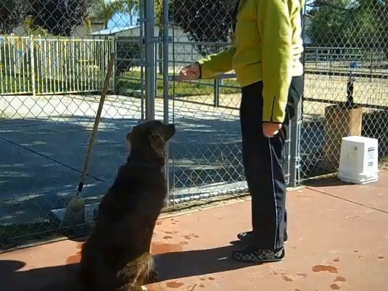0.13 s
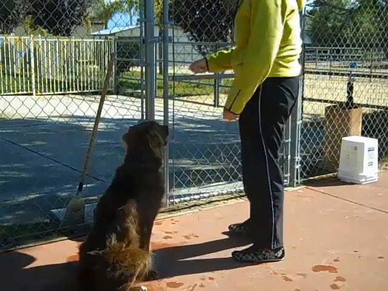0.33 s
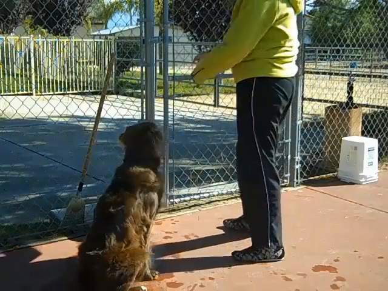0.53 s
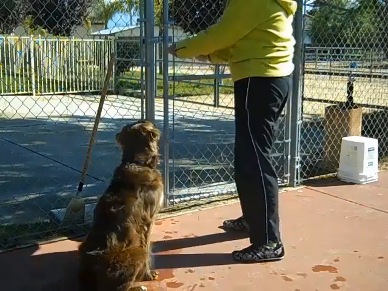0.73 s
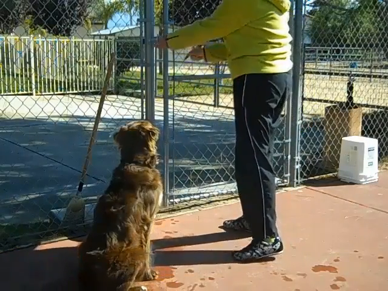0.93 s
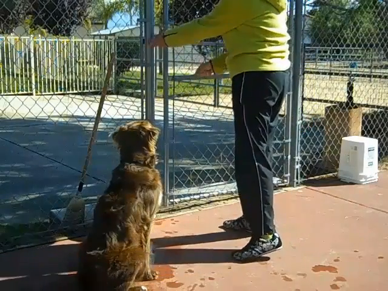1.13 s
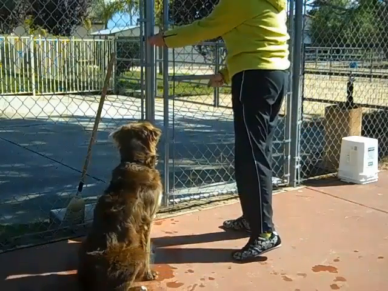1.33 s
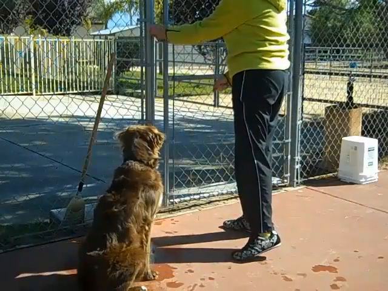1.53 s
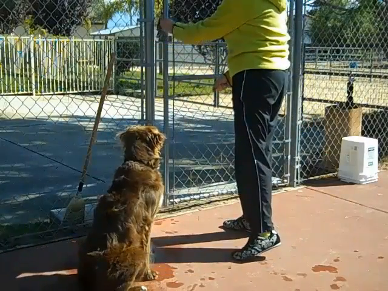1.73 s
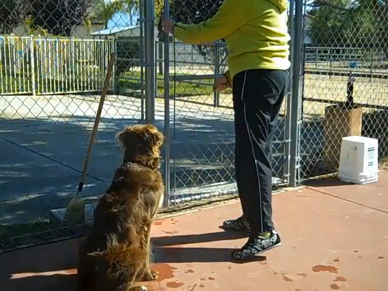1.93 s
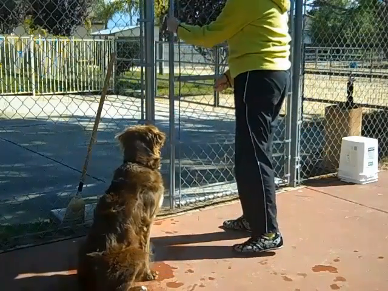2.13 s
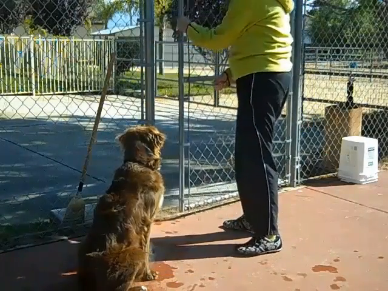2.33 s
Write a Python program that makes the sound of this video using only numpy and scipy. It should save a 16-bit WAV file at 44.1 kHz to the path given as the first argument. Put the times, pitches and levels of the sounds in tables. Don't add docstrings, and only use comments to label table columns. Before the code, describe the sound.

A metal gate latch clinks twice, scrapes briefly, then drops with a loud ringing clank outdoors

```python
import sys
import numpy as np
from scipy import signal
from scipy.fft import rfft, irfft
from scipy.io import wavfile
from scipy.ndimage import uniform_filter1d

SR = 44100
rng = np.random.default_rng(int(sys.argv[2]) if len(sys.argv) > 2 else 0)


def bounce(signal):
    frames = np.transpose(np.atleast_2d(signal))
    limited = np.clip(frames, -1, 1)
    pcm = np.round(limited * 32767).astype(np.int16)
    wavfile.write(sys.argv[1], SR, pcm)


def undo_db(level):
    steps = np.asarray(level, float) / 20
    return 10 ** steps


N = 109720


def read(points, hz):
    f, value = np.transpose(points)
    return np.interp(np.log(hz + 1), np.log(f + 1), value)


def over_time(points, column=1):
    table = np.array(points)
    return np.interp(np.arange(N) / SR, table[:, 0], table[:, column])


def evened(x):
    return x / np.sqrt(np.mean(x ** 2) + 1e-20)


def add(mix, start_s, sound):
    part = mix[round(start_s * SR):][:len(sound)]
    part += sound[:len(part)]


def resonate(x, pitch_hz, width_hz):
    turn = np.exp(2j * np.pi * np.cumsum(pitch_hz * np.ones(len(x))) / SR)
    radius = np.exp(-np.pi * width_hz / SR)
    return 2 * (turn * signal.lfilter([1 - radius], [1, -radius], x / turn)).real


def narrow_noise(size, pitch_hz, width_hz):
    once = resonate(rng.standard_normal(size), pitch_hz, width_hz)
    return evened(resonate(once, pitch_hz, width_hz))


def coloured(x, points, share=1):
    hz = np.fft.rfftfreq(x.shape[-1], 1 / SR)
    return irfft(rfft(x) * undo_db(share * read(points, hz)), x.shape[-1])


# pitch_hz, likeness (0 to 1)
PORT_LIKENESS = [(60, 1), (180, 0.56), (540, 0.67), (1630, 0.39), (4900, 0.029), (14700, 0.29)]


def hiss(colour, patchy_db, size):
    hz = np.fft.rfftfreq(size, 1 / SR)
    a, b, c, d, patches = rng.standard_normal((4 * N // size + 5, len(hz), 5)).T
    patches = uniform_filter1d(uniform_filter1d(patches, size=9, axis=0), size=6, axis=1)
    same = np.clip(read(PORT_LIKENESS, hz), -1, 1)[:, None]
    left = a + 1j * b
    right = same * left + np.sqrt(1 - same ** 2) * (c + 1j * d)
    gain = undo_db(read(colour, hz)[:, None] + patchy_db * evened(patches))
    noise = signal.istft(np.array([left, right]) * gain, nperseg=size, noverlap=3 * size // 4)[1]
    return evened(noise[:, :N])


# pitch_hz, density_db (dB per Hz)
WASH_SPECTRUM = [(20, -8), (124, -9), (1000, -15), (1700, -23), (5500, -24.5), (8000, -24), (9800, -33),
                 (14500, -33.5)]
# pitch_hz, left_minus_right_db
WASH_BALANCE = [(60, -3.5), (180, 2), (540, 1.5), (1630, 1.5), (4900, 1), (14700, 2)]


def traffic_wash():
    wash = undo_db(-54.5) * hiss(WASH_SPECTRUM, 0.43, size=1024)
    return np.array([coloured(wash[0], WASH_BALANCE, 0.24), coloured(wash[1], WASH_BALANCE, -1.4)])


# start_s, pitch_hz, level_db
DRONE_COURSE = [(0, 130.4, -70.5), (.35, 126.3, -62), (.7, 118.5, -63.5), (1.05, 117.8, -62.5),
                (1.3, 128.9, -64.5), (1.65, 129, -59), (2.49, 131.3, -64.5)]


def traffic_drone():
    pitch_hz = over_time(DRONE_COURSE)
    blur = evened(resonate(rng.standard_normal(N), pitch_hz, 33))
    tone = 1.05 * np.sin(2 * np.pi * np.cumsum(pitch_hz) / SR)
    return undo_db(over_time(DRONE_COURSE, column=2)) * (blur + tone)


# start_s, level_db
WIND_GUSTS = [(0, -81), (.8, -63), (1.5, -67), (2.0, -61.5), (2.06, -45.5), (2.16, -52.5), (2.3, -59),
              (2.44, -52), (2.49, -51)]


def wind():
    band = signal.butter(2, [34, 75], "band", fs=SR, output="sos")
    lumps = evened(signal.sosfilt(band, rng.standard_normal((2, N))))
    port_db = np.array([[-4], [1]])
    return undo_db(over_time(WIND_GUSTS) + port_db) * lumps


def bird():
    start_s, length_s, echo_delay_s = 0.372, 0.031, 0.047
    t, out = np.arange(0, length_s, 1 / SR), np.zeros(N)
    swoop_hz = 1680 * np.exp(-t / 0.00186)
    upper = np.sin(2 * np.pi * np.cumsum(6780 + swoop_hz) / SR)
    lower = 0.55 * np.sin(2 * np.pi * np.cumsum(6430 + swoop_hz) / SR)
    chip = undo_db(-42) * (upper + lower) * np.sin(np.pi * t / length_s) ** 0.52
    add(out, start_s, chip)
    add(out, start_s + echo_delay_s, undo_db(-24) * chip)
    return out


# start_s, level_db, pitch_hz, width_hz, t60_s
WIRE_TICKS = [(.058, -46, 7250, 3000, 0.021), (.087, -51, 2730, 1490, 0.036),
              (.646, -43, 6100, 1500, 0.024), (.74, -41, 5040, 1200, 0.019), (.8305, -39, 5610, 2500, .015),
              (.868, -47.5, 6220, 700, 0.016), (.916, -50, 5210, 900, .02), (.9635, -49, 5320, 1200, .02),
              (1.347, -48, 5000, 1500, .02), (1.576, -43, 5750, 700, 0.089),
              (1.702, -38.5, 7800, 4000, .026), (1.712, -33.5, 7650, 2482, 0.017),
              (2.27, -43, 507.4, 302, 0.036), (2.4055, -36, 4530, 5000, 0.0062),
              (2.445, -51, 5960, 2000, 0.017), (2.486, -44.5, 6470, 2000, .026)]


def wire_ticks():
    out, t = np.zeros(N), np.arange(SR // 4) / SR
    for start_s, level_db, pitch_hz, width_hz, t60_s in WIRE_TICKS:
        snap = narrow_noise(len(t), pitch_hz, width_hz)
        rise = np.minimum(10 * t / t60_s, 1)
        add(out, start_s, undo_db(level_db - 3 - 60 * t / t60_s) * rise * snap)
    return out


# start_s, level_db, t60_s, pitch_hz
NARROW_RINGS = [
    (.345, -68, .08, 14200),
    (.648, -74, 0.11, 13900),
    (.73, -67, 0.32, 13900),
    (1.5, -72, .15, 13800),
    (1.738, -61, .1, 14250),
    (1.93, -62, 0.13, 13900),
    (2.18, -54, 0.13, 2704),
    (2.185, -57, .12, 4230),
]


def narrow_rings():
    out, t = np.zeros(N), np.arange(SR // 4) / SR
    for start_s, level_db, t60_s, pitch_hz in NARROW_RINGS:
        ring = evened(resonate(rng.standard_normal(len(t)), pitch_hz, 60))
        add(out, start_s, undo_db(level_db - 60 * t / t60_s) * ring)
    return out


def cloth_zip():
    out, t = np.zeros(N), np.arange(SR // 4) / SR
    way = np.minimum(t / 0.05, 1)
    pitch_hz = 6200 + (7500 - 6200) * way
    add(out, 0.696, undo_db(-56) * np.sin(np.pi * way) * narrow_noise(len(t), pitch_hz, 570))
    return out


# start_s, level_db
SLEEVE_MOTION = [(.3, -76), (.55, -68), (.62, -60), (.69, -64.5), (.72, -57), (.82, -58), (.9, -65),
                 (1.0, -66.5), (1.15, -79)]
# pitch_hz, density_db (dB per Hz)
SLEEVE_SPECTRUM = [(880, -44.5), (1500, -20), (3450, -9), (5150, 8), (5600, 9.5), (7010, 16.5),
                   (12800, -12.5), (14000, -16)]


def sleeve():
    return undo_db(over_time(SLEEVE_MOTION)) * hiss(SLEEVE_SPECTRUM, 1.1, size=256)


# start_s, level_db
SHOE_MOTION = [(0, -62.5), (.1, -61), (.18, -57), (.22, -86), (.33, -68), (.4, -89)]
# pitch_hz, density_db (dB per Hz)
SHOE_SPECTRUM = [(530, -28), (900, -2), (4150, -5.5), (4830, -8.5), (7370, -6.5), (12000, -32.5),
                 (15600, -64), (22000, -120)]


def shoe():
    return undo_db(over_time(SHOE_MOTION)) * hiss(SHOE_SPECTRUM, 2.7, size=256)


def struck(hits, modes, buzz, buzz_db, buzz_t60, mesh_db):
    out, t = np.zeros(N), np.arange(SR // 2) / SR
    pitch_hz, mode_db, t60_s = np.tile(np.transpose(modes), 3)[:, :, None]
    side = np.repeat([-1, 0, 1], len(modes))[:, None]
    pitch_hz = pitch_hz * (1 + 0.005 * (side + rng.uniform(-0.3, 0.28, pitch_hz.shape)))
    t60_s = t60_s * rng.uniform(0.46, 1.02, pitch_hz.shape)
    rise = np.minimum(t * pitch_hz / 1.5, 1)
    rings = undo_db(mode_db - 60 * t / t60_s) * np.sin(2 * np.pi * pitch_hz * t) * rise
    flutter = evened(uniform_filter1d(rng.standard_normal(rings.shape), size=330))
    rings = rings * undo_db(5 * np.minimum(t / 0.03, 1) * flutter)
    mesh_t60_s = 0.29
    fall = undo_db(buzz_db - 60 * t / buzz_t60) + undo_db(mesh_db - 60 * t / mesh_t60_s)
    octaves = [(625, -2), (5000, 0), (20000, 1.5)]
    for start_s, level_db, tilt_db in hits:
        dense = evened(coloured(rng.standard_normal(len(t)), buzz)) * fall
        shares = rng.choice([-1, 1], len(pitch_hz)) * rng.uniform(0.56, 1.195, len(pitch_hz))
        blow = coloured(0.23 * shares @ rings + dense, octaves, tilt_db)
        add(out, start_s, undo_db(level_db) * np.minimum(t / 0.00067, 1) * blow)
    return out


# pitch_hz, density_db (dB per Hz)
COLLAR_DENSE = [(470, -18), (800, -5.5), (2690, 4.5), (3440, -9), (4240, 1), (4680, 0.5), (13400, -33.5),
                (15000, -48.5)]
# start_s, level_db
SLIDE_MOTION = [(1.47, -71), (1.5, -53), (1.55, -62), (1.6, -59.5), (1.66, -54), (1.71, -48.5), (1.75, -53),
                (1.8, -59), (1.82, -65.5)]
# pitch_hz, level_db
SLIDE_SQUEAL = [(1384, -9), (2440, -10), (2735, -13), (3219, -12), (4110, -1), (6170, -8)]


def collar_slide():
    flicker = evened(uniform_filter1d(rng.standard_normal(N), size=120))
    grit = rng.standard_normal(N) * undo_db(2.2 * flicker)
    rings = np.zeros(N)
    for pitch_hz, level_db in SLIDE_SQUEAL:
        rings += undo_db(level_db) * evened(resonate(resonate(grit, pitch_hz, 70), pitch_hz, 70))
    first_s, last_s = SLIDE_MOTION[0][0], SLIDE_MOTION[-1][0]
    moving = abs(np.arange(N) / SR - (first_s + last_s) / 2) < (last_s - first_s) / 2
    return moving * undo_db(over_time(SLIDE_MOTION)) * (evened(coloured(grit, COLLAR_DENSE)) + 0.51 * rings)


# start_s, level_db, tilt_db (dB per octave)
COLLAR_TOUCHES = [(1.5, -56, -4), (1.6035, -28.5, 1.5), (1.608, -37, -0.5), (1.612, -34.5, -4),
                  (1.617, -33.5, 1), (1.627, -44, 9), (1.665, -37.5, -1), (1.692, -42, -6),
                  (1.702, -37.5, 1), (1.71, -39, 4), (1.732, -45, 1)]
# pitch_hz, level_db, t60_s
COLLAR_MODES = [(1397, -14, 0.15), (2490, -7, 0.14), (2735, -18, .2), (3178, -0.5, .1), (3709, -5, .08),
                (4030, -10, 0.44), (4377, -8, .15), (5860, -11.5, .15), (7300, -9.5, 0.11)]


def collar_touches():
    return struck(COLLAR_TOUCHES, COLLAR_MODES, COLLAR_DENSE, -17.5, 0.075, -21.0)


# start_s, level_db, tilt_db (dB per octave)
FORK_TOUCHES = [(1.1848, -17.5, 3.5), (1.193, -26.5, -3), (1.198, -26.5, -4.5), (1.348, -45.5, -2),
                (1.374, -43, -1), (1.3935, -24, 2), (1.4025, -23.5, -3.5), (1.4065, -26.5, -3),
                (1.5755, -40, 2), (1.578, -45, 3), (1.589, -48, 3), (1.598, -45, 8)]
# pitch_hz, level_db, t60_s
CLINK_MODES = [(3435, -14.5, 0.21), (3700, -20, 0.14), (3860, -20.5, 0.2), (4045, -15.5, 0.2),
               (4240, -14, 0.11), (4410, -18, 0.128), (4380, -13.5, .13), (4670, -21.5, .15),
               (6150, -4, 0.12), (6200, -4.5, 0.067), (6835, -17.5, .12), (7262, -15, .12),
               (7690, -3, 0.089), (8040, -13, 0.074),
               (806, -12.5, 0.066), (1180, -15.5, 0.1), (1766, -29, 0.1), (1940, -22.5, 0.17),
               (2200, -18.5, .15), (2440, -21, 0.12), (2724, -22, 0.23), (5670, -21, .1),
               (9970, -14.5, 0.048)]
# pitch_hz, density_db (dB per Hz)
FORK_DENSE = [(120, -68), (200, -25.5), (1150, -19), (2210, -21.5), (4090, -15.5), (5170, -18), (6300, 0),
              (10100, -30.5), (15000, -43.5)]


def fork_clinks():
    return struck(FORK_TOUCHES, CLINK_MODES, FORK_DENSE, -11, 0.054, -30.5)


# start_s, level_db, tilt_db (dB per octave)
POST_BLOWS = [
    (1.8112, -17, -0.5),
    (1.8138, -8.5, 0),
    (1.8178, -14.5, -1.5),
    (1.824, -25.5, 0.5),
    (1.834, -27, -3),
    (1.856, -36.5, -5),
    (1.877, -31.5, -4),
]
# pitch_hz, level_db, t60_s
CLANK_MODES = [(296, -16, 0.039), (1319, -18.5, 0.18), (1530, -9.5, 0.11), (2118, -17.5, 0.26),
               (2460, -18, .25), (2614, -16, .3), (2710, -17, 0.52), (2758, -18, .4), (2838, -13, 0.26),
               (3040, -15, 0.38), (3676, -13, .2), (4100, -13.5, 0.52), (4340, -13, 0.28),
               (4240, -8.5, 0.62),
               (582, -33, 0.0526), (4500, -5, .15), (5050, -6, .15), (5210, -4.5, .15), (5690, -12, 0.21),
              (6040, -16, 0.17), (6449, -29, .2), (7041, -22, 0.15), (7220, -8, 0.11), (7500, -9.5, 0.13),
              (7600, -9, .25), (8200, -18, 0.22), (8870, -16, .08)]
# pitch_hz, density_db (dB per Hz)
POST_DENSE = [(300, -27), (1000, -13), (1500, -7.5), (3500, 0.5), (7500, 3.5), (9000, -5.5), (10000, -18),
              (14500, -22.5)]


def post_clank():
    return struck(POST_BLOWS, CLANK_MODES, POST_DENSE, -2.6, 0.049, -18.5)


# pitch_hz, t60_s
YARD_DECAY = [(300, 0.82), (1500, 0.53), (4000, 0.42), (8000, 0.33), (14000, 0.52)]


def yard(x):
    taps = np.zeros((2, SR // 2))
    at = np.arange(300, SR // 2 - 20, 20) + rng.integers(0, 20, (2, (SR // 2 - 301) // 20))
    np.put_along_axis(taps, at, rng.choice([-1., 1.], at.shape), 1)
    taps[1] = 0.23 * taps[0] + 2.1 * taps[1]
    hz, t, bands = signal.stft(taps, SR, nperseg=256)
    decay = undo_db(-60 * t / read(YARD_DECAY, hz)[:, None])
    tail = signal.istft(bands * decay, SR, nperseg=256)[1]
    tail = tail / np.linalg.norm(tail, axis=1)[:, None]
    return signal.fftconvolve(x[None], tail, axes=1)[:, :N]


# pitch_hz, left_minus_right_db
PORT_COLOUR = [(300, -1.5), (4500, 1.5), (6200, -7), (7200, 10), (8200, 18), (11000, 13), (14000, 22)]


def scene():
    outdoors = traffic_wash() + traffic_drone() + wind()
    chip = bird()
    wires = wire_ticks() + narrow_rings() + cloth_zip()
    body = sleeve() + shoe()
    gate = collar_slide() + collar_touches() + fork_clinks() + post_clank()
    echoes = undo_db(-10) * yard(gate + undo_db(-11) * chip)
    near = gate + echoes + chip + wires + body
    return np.array([coloured(near[0], PORT_COLOUR, 0.4), coloured(near[1], PORT_COLOUR, -0.74)]) + outdoors


def roll_off(x):
    return signal.sosfilt(signal.butter(12, 14600, fs=SR, output="sos"), x)


def record(dry):
    limited = 1.4 * np.tanh(dry / 1.4)
    edge = signal.firwin(255, 14300, window=("kaiser", 6), fs=SR)[None]
    finished = signal.oaconvolve(limited, edge, "same")
    return roll_off(finished)


dry = scene()
out = record(dry)
bounce(out)
```